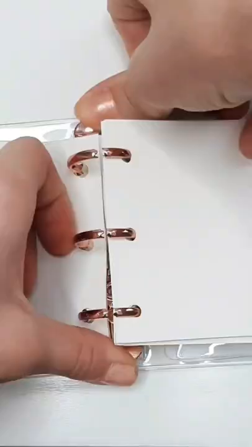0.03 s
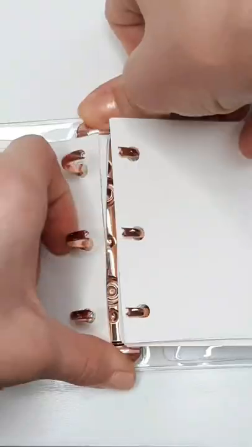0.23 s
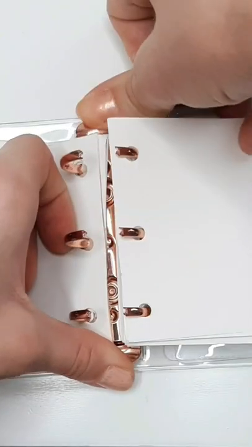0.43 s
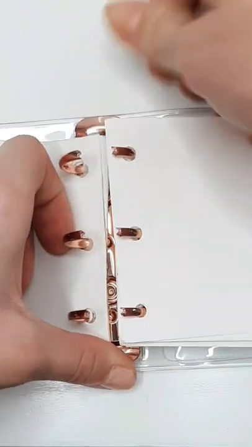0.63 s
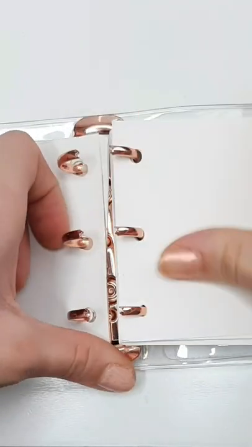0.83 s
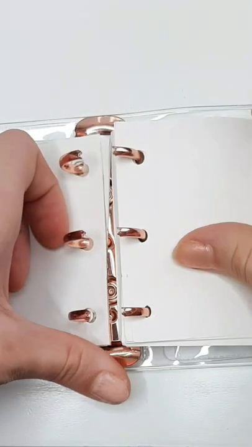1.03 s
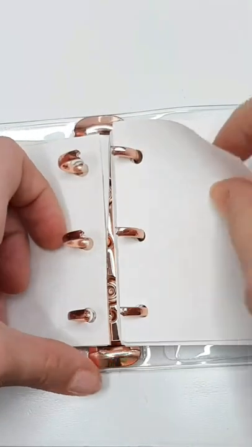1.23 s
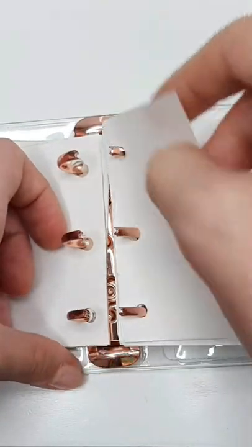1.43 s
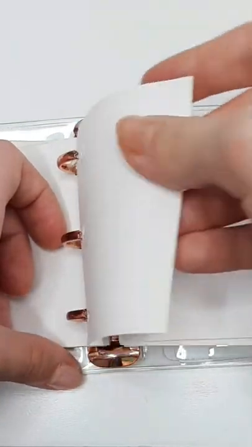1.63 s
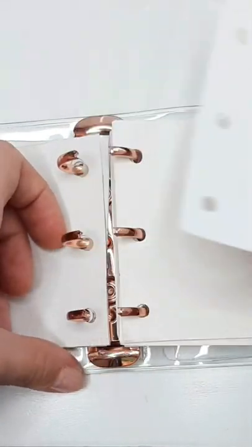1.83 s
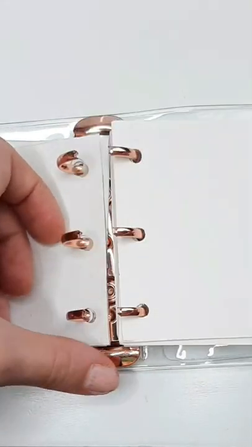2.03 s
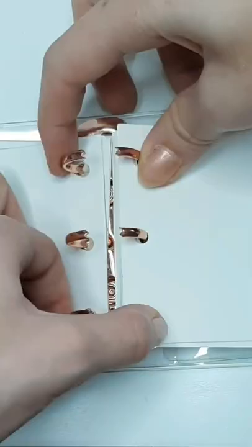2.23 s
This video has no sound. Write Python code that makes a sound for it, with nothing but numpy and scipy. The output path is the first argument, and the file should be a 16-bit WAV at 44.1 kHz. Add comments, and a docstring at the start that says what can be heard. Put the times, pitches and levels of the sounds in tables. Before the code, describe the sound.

A sharp snap of binder rings opening, followed by light knocks and rustling paper.

```python
"""Opening a binder and turning a page

A spring creaks and snaps a small binder's metal rings open, shaking the cover and desk and
overloading the microphone. Fingers shift and knock on the cover. Then a page slides, catches on
the rings, flaps free and brushes over the other pages; its rustle is countless tiny slips of
paper fibres. A small hard room echoes the knocks and the paper, over a faint steady noise."""
import sys
import numpy as np
from scipy import signal
from scipy.fft import rfft, irfft, next_fast_len
from scipy.io import wavfile

SR = 44100
rng = np.random.default_rng(int(sys.argv[2]) if len(sys.argv) > 2 else 0)


def to_wav(sig):
    """Store sig (one row per channel, or 1-D mono) as 16-bit WAV at the path in sys.argv[1].

    Samples outside -1..1 are clipped; the rate is SR.
    """
    pcm = np.clip(np.atleast_2d(sig), -1, 1) * 32767
    pcm = np.round(pcm).astype(np.int16)
    wavfile.write(sys.argv[1], SR, pcm.T)  # frames by channels


N = 101429

# Levels in dB are relative. A fade time (t60) is how long a sound takes to drop by 60 dB.
# The spring creaks. Each row: start in seconds, hold in seconds, level in dB.
CREAKS = [(.002, 0.025, -39), (0.216, 0.0024, -15.5)]
# The tones of the ring tips. Each row: pitch in Hz, width in Hz.
TIP_TONES = [(3350, 470), (3850, 300), (5150, 160)]
# The hiss of shifting fingers. Each row: time in seconds, level in dB.
FINGER_LEVELS = [(.04, -65), (.435, -73), (0.453, -41.5), (.52, -57), (.62, -56.5), (0.801, -62),
                 (.93, -47.5), (1.02, -64), (1.09, -88)]
# Knocks on the cover. Each row: start in seconds, hold in seconds, thud in dB, tick in dB.
KNOCKS = [(0.127, .015, -55, -80), (.18, 0.05, -54.5, -87), (0.596, 0.021, -36.5, -43.5),
          (0.628, 0.047, -54, -55), (0.7, 0.0029, -45.5, -44.5), (0.826, 0.0064, -41, -45),
          (0.848, 0.016, -40, -39.5), (0.874, 0.0029, -37, -33), (1.019, .005, -57, -72),
          (1.106, 0.0016, -55, -51), (1.165, 0.0068, -45.5, -52), (1.844, 0.0071, -47.5, -30.5)]
# The metal spine answers each knock. Each row: pitch in Hz, width in Hz, gain.
SPINE_TONES = [(900, 70, .7), (2056, 60, 1.8)]
# Spine, cover and desk ring together at the snap.
# Each row: pitch in Hz, level in dB, fade time in seconds, left side's lead in radians.
BINDER_TONES = [(72.5, -15.5, 0.46, 0.16), (123.7, 4, 0.27, 0), (168.5, -4.5, 0.39, 1.8),
                (245.8, -6, .3, 0), (393.6, -4.5, 0.25, 0.8), (522.5, -1.5, .26, 1.2),
                (634.3, 8.5, 0.22, 1.1), (666, 7, 0.25, .9), (687.4, -1, 0.21, 1.2), (731.3, -9, 0.19, 3.4),
                (902.6, 6, 0.25, 0.74), (943.5, -0.5, 0.33, 1.5), (1223, -18.5, 0.48, 0.43),
                (1560, -17, .28, 1.8)]
# The tones of the bent sheet. Each row: pitch in Hz, width in Hz, gain.
SHEET_TONES = [(1094, 46, 0.68), (1472, 20, 1), (1565, 92, 0.21), (2700, 53.2, 0.56)]
# Paper rubs on paper, one list per stroke. Each row: time in seconds, rasp in dB, hiss in dB.
STROKES = [
    [(0, -40.5, -51), (.022, -36.5, -31), (.031, -66, -74)],
    [(1.1, -67, -56), (1.132, -62, -37), (1.16, -45.5, -24.5), (1.195, -48, -47.5), (1.22, -39.5, -39),
     (1.28, -53, -52), (1.322, -38, -34), (1.348, -47.5, -47.5), (1.367, -37.5, -40.5), (1.385, -46.5, -45),
     (1.437, -43, -43), (1.448, -31, -25.5), (1.483, -24, -27), (1.495, -28, -35), (1.55, -33.5, -57),
     (1.595, -24, -56), (1.63, -41, -40), (1.71, -36.5, -42.5), (1.8, -48, -44), (1.86, -61, -32.5),
     (1.885, -56, -58)],
    [(1.955, -60, -54), (1.971, -59, -46), (1.979, -26, -19), (2.02, -27, -32.5), (2.07, -37.5, -37),
     (2.103, -27, -26), (2.137, -41, -39.5), (2.18, -30, -28), (2.2, -47, -55), (2.27, -73.5, -80.5)],
]
# The page catches. Each row: start in seconds, hold in seconds, then bass, middle and treble in dB.
FLICKS = [(1.252, 0.0036, -74, -40, -34.5), (1.392, 0.0057, -68, -41.5, -29),
          (1.427, .002, -58, -37, -30.5), (1.452, 0.0053, -36, -32.5, -34), (1.5055, .004, -25, -9, -13),
          (1.512, 0.0071, -28, -7.5, -10.5), (1.522, 0.011, -23.5, -21, -21),
          (1.5638, 0.0066, -19, -5.5, -5), (1.7194, 0.0015, -44, -15, -9), (1.759, 0.0016, -32.5, -46, -36),
          (1.81, 0.0018, -67, -56, -53), (1.854, 0.0087, -64, -35.5, -42), (1.974, 0.0053, -33.5, -19, -35),
          (1.998, 0.01, -30.5, -17.5, -15), (2.021, 0.03, -29.5, -23, -50),
          (2.0433, 0.0057, -37, -28.5, -28)]
# Fade times in seconds for a flick's bass, middle and treble. The treble dies first.
FLICK_FADES = [0.054, 0.044, 0.024]
# The page's edge ticks. Each row: start in seconds, level in dB.
EDGE_TICKS = [(1.253, -43), (1.394, -32), (1.566, -30), (1.7208, -18), (1.791, -26), (1.8145, -27),
              (1.96, -37.5), (1.9737, -15), (2.005, -10), (2.045, -15.5), (2.181, -20.5), (2.199, -26.5)]
# Puffs of air. Each row: start in seconds, hold in seconds, level in dB.
PUFFS = [(1.487, 0.074, -41), (1.573, 0.011, -49), (1.727, 0.015, -34.5), (1.75, 0.029, -41),
         (1.839, 0.027, -46.5), (1.921, .03, -61)]
# The taut sheet rings. Each row: pitch in Hz, level in dB.
FLAP_TONES = [(1670, -11), (2770, -25.5), (3060, -38)]
# Paper and knocks lean left. Each row: frequency in Hz, how much louder the left is in dB.
LEFT_BALANCE = [(60, 6), (400, 7), (1500, 4.5), (4500, 4.5), (8000, 3), (13000, 0.5)]

# A colour says how strong a noise is from bass to treble. Each row: frequency in Hz, level in dB.
FINGER_COLOUR = [(3000, -27), (6000, -9.5), (9000, -15), (12000, -0.5), (14000, 0.5), (16000, -3)]
THUD_COLOUR = [(25, -17.5), (80, -1), (160, -6), (260, -3.5), (420, -10), (800, -1.5), (1300, -12),
               (2100, -12), (3200, -22.5), (15000, -41)]  # the knocked cover
TICK_COLOUR = [(25, -31), (1000, -21.5), (3000, -0.5), (5500, 6), (7000, 6), (9000, -8), (13000, 4),
               (16000, -9.5)]  # hard contact, in the knocks and the snap
RATTLE_COLOUR = [(25, -26.5), (60, -7.5), (110, -7.5), (220, 7.5), (420, -4.5), (800, 3.5), (1100, -7.5),
                 (1900, -8), (2600, -23.5), (4400, -29), (5300, -19.5), (6300, -29.5), (7600, -27),
                 (9500, -29.5), (15000, -32.5)]  # the ring mechanism and its echo
RASP_COLOUR = [(25, -24), (300, -19), (900, -17.5), (1600, -8), (2300, -2.5), (3200, -3.5), (4300, -1),
               (6500, -12), (15000, -36)]  # the rough part of rubbing paper
HISS_COLOUR = [(500, -37.5), (2800, -25), (4500, -4), (7000, 7), (8800, -11), (11500, 2.5), (14000, -1),
               (16000, 1)]  # its bright part
FLICK_COLOURS = [
    [(25, -8.5), (120, -14.5), (280, -0.5), (500, 1.5), (780, 2), (1200, -6.5), (3000, -46)],
    [(300, -41.5), (700, -12.5), (1050, -4.5), (1600, -1.5), (2800, -4.5), (4000, -8), (8000, -40.5)],
    [(1200, -35), (3000, 3.5), (4200, 2.5), (7300, 2.5), (8800, -13), (11500, -7.5), (16000, -13)],
]  # one list each for bass, middle and treble
EDGE_COLOUR = [(300, -15), (1500, -12), (4500, 7.5), (7000, -4.5), (9000, -8), (12500, 3), (16000, -1)]
PUFF_COLOUR = [(25, -14), (60, 0.5), (130, 0.5), (250, -4), (500, -9.5), (1500, -54.5)]
FLAP_COLOUR = [(25, -31), (100, -13.5), (400, -21), (900, -13.5), (1400, 0), (1700, 1.5), (2050, -1.5),
               (2900, 3), (3800, -5), (6000, -26), (15000, -49)]
ROOM_COLOUR = [(25, 6), (150, 3), (500, 3), (1800, 1.5), (4000, -4.5), (6500, 0), (9000, -2), (16000, 2.5)]
BACKGROUND_COLOUR = [(25, -14), (70, 1), (130, 0.5), (300, -7), (800, -10), (2000, -16.5), (4000, -21.5),
                     (6500, -20.5), (9000, -30.5), (13000, -16.5), (16000, -16)]

SNAP_S, SNAP_RISE_S = .2195, .0024
FLAP_S, FLAP_RISE_S, FLAP_HOLD_S = 1.7455, .0027, .011
TIME = np.arange(N) / SR  # seconds at each sample


def from_db(db):
    """Turn decibels into a gain to multiply by."""
    return 10 ** (np.asarray(db) / 20)


def rms_one(x):
    """Scale a sound to an average (RMS) level of one."""
    return x / np.sqrt(np.mean(x ** 2) + 1e-20)


def colour(x, points):
    """Give a noise a colour and a level of one."""
    hz, db = np.transpose(points)
    size = next_fast_len(N)
    bins = np.maximum(np.fft.rfftfreq(size, 1 / SR), 1)
    gain = from_db(np.interp(np.log(bins), np.log(hz), db))
    return rms_one(irfft(rfft(x, size) * gain, size)[..., :N])


def spread(mid, side, likeness=.63):
    """Mix two unrelated sounds into a partly alike left and right."""
    return np.sqrt(1 + likeness) * mid + np.sqrt(1 - likeness) * side * np.array([[1], [-1]])


def white_noise():
    """Stereo noise, equally strong at all frequencies."""
    return spread(*rng.standard_normal((2, N)))


def noise(points):
    """Smooth stereo noise of a given colour."""
    return colour(white_noise(), points)


def resonance(x, hz, width_hz):
    """Let a sound ring at one pitch; a narrower width rings longer."""
    r = np.exp(-np.pi * width_hz / SR)
    feedback = [1, -2 * r * np.cos(2 * np.pi * hz / SR), r * r]
    return signal.lfilter(np.array([1, 0, -1]) * (1 - r * r) / 2, feedback, x)


def burst(start, rise, hold, t60):
    """A gain that rises, holds and fades. All times are in seconds."""
    t = TIME - start
    return np.clip(t / rise, 0, 1) * from_db(-60 * np.clip((t - rise - hold) / t60, 0, 3))


def bursts(rows, rise, t60):
    """Add up one burst for each row of start, hold and dB."""
    return sum(from_db(db) * burst(start, rise, hold, t60) for start, hold, db in rows)


def level(times, db):
    """A gain that follows a level curve and is silent outside it."""
    return from_db(np.interp(TIME, times, db, left=-150, right=-150))


def wander(step_s, channels):
    """Drift between -1 and 1, with a new random goal at each step."""
    goals = rng.uniform(-1, 1, (channels, N))
    return np.array([np.interp(TIME / step_s, np.arange(N), row) for row in goals])


def spring_creak():
    """The spring creaks under strain before it gives way."""
    creak = rms_one(resonance(white_noise(), hz=690, width_hz=32))
    return creak * bursts(CREAKS, rise=.0011, t60=.025)


def tip_click():
    """The ring tips click against each other once."""
    metal = rms_one(sum(resonance(white_noise(), hz, width) for hz, width in TIP_TONES))
    return from_db(-24) * metal * burst(start=.0255, rise=.00042, hold=.0021, t60=.0054)


def finger_hiss():
    """A faint high hiss swells as the fingers shift."""
    return level(*np.transpose(FINGER_LEVELS)) * noise(FINGER_COLOUR)


def cover_knocks(rise=.0013):
    """Fingers and rings knock on the cover: a thud, a tick and the metal spine ringing."""
    thuds = [(start, hold, db) for start, hold, db, _ in KNOCKS]
    ticks = [(start, hold, db) for start, hold, _, db in KNOCKS]
    thud = noise(THUD_COLOUR) * bursts(thuds, rise, t60=.053)
    tick = noise(TICK_COLOUR) * bursts(ticks, rise, t60=.025)
    spine = sum(gain * resonance(thud, hz, width) for hz, width, gain in SPINE_TONES)
    return thud + tick + spine


def ring_snap(chatter_db=1.5, bass_below_hz=130):
    """The spring throws the rings open: a crack of metal, ringing tones and a dying rattle."""
    snap = from_db(.5) * noise(TICK_COLOUR) * burst(SNAP_S, SNAP_RISE_S, hold=0, t60=.03)
    for k, (hz, db, t60, lead) in enumerate(BINDER_TONES):
        chatter = chatter_db * wander(step_s=.0099, channels=2)  # loose rings shake each tone
        tone = (-1) ** k * np.sin(2 * np.pi * hz * (TIME - SNAP_S) - np.array([[0], [lead]]))
        snap += from_db(db - .5 + chatter) * tone * burst(SNAP_S, SNAP_RISE_S, 0, t60)
    rattle = from_db(9.5) * delay_right(noise(RATTLE_COLOUR), lag_s=.00006)
    for band, t60 in (("low", .42), ("high", .29)):  # the bass lasts longer
        band_filter = signal.butter(2, bass_below_hz, band, fs=SR, output="sos")
        snap += signal.sosfilt(band_filter, rattle) * burst(SNAP_S, SNAP_RISE_S, 0, t60)
    return snap * from_db([[1], [-1]])  # a little louder on the left


def fibres(points, slips_per_s=3800, slip_share=.55, clump_db=4):
    """Paper fibres make countless tiny slips, in clumps, and the sheet rings with them."""
    slipping = rng.random(N) < slips_per_s / SR
    sizes = slipping * from_db(2 * np.minimum(rng.exponential(1, N), 4))
    slips = np.sqrt(slip_share) * rms_one(sizes) * rng.choice([-1, 1], (2, N))
    smooth = np.sqrt(1 - slip_share) * rng.standard_normal((2, N))
    rustle = spread(*(slips + smooth)) * from_db(clump_db * wander(step_s=.004, channels=1))
    ringing = sum(gain * resonance(rustle, hz, width) for hz, width, gain in SHEET_TONES)
    return colour(rustle + ringing, points)


def page_slide():
    """Paper rubs on paper with a grainy rasp and a hiss."""
    strokes = [np.transpose(rows) for rows in STROKES]
    rasp = sum(level(times, db) for times, db, _ in strokes) * fibres(RASP_COLOUR)
    hiss = sum(level(times, db) for times, _, db in strokes) * fibres(HISS_COLOUR)
    return rasp + hiss


def finger_squeak():
    """A fingertip sticks on the page with one tiny squeak."""
    squeak = rms_one(resonance(rng.standard_normal(N), hz=13900, width_hz=190))
    return from_db(-29) * squeak * burst(start=1.137, rise=.0013, hold=.0024, t60=.06)


def page_flicks():
    """The page crackles as its punched holes catch on the rings and jump off."""
    crackle = 0
    for band, (points, t60) in enumerate(zip(FLICK_COLOURS, FLICK_FADES)):
        flicks = [(start, hold, levels[band]) for start, hold, *levels in FLICKS]
        crackle += fibres(points) * bursts(flicks, rise=.00042, t60=t60)
    return from_db(-1.5) * crackle


def edge_ticks():
    """The edge of the page gives short, dry, bright ticks."""
    ticks = sum(from_db(db) * burst(start, rise=.0003, hold=.00034, t60=.0095)
                for start, db in EDGE_TICKS)
    return fibres(EDGE_COLOUR) * ticks


def air_puffs():
    """The moving page pushes air at the microphone."""
    return noise(PUFF_COLOUR) * bursts(PUFFS, rise=.008, t60=.091)


def page_flap():
    """The freed page flaps once."""
    return from_db(-6) * fibres(FLAP_COLOUR) * burst(FLAP_S, FLAP_RISE_S, FLAP_HOLD_S, t60=.042)


def sheet_ring():
    """The taut sheet rings briefly as it flaps."""
    tones = sum(from_db(db) * np.sin(2 * np.pi * hz * (TIME - FLAP_S)) for hz, db in FLAP_TONES)
    return tones * burst(FLAP_S, FLAP_RISE_S, FLAP_HOLD_S, t60=.026)


def add_desk_echo(x, gain=.43, delay_s=.0010675, swing_s=.0005):
    """The desk reflects the sound, with a delay that wanders as the sheet bends."""
    delays = delay_s + swing_s * wander(step_s=.06, channels=1)[0]
    echo = np.array([np.interp(TIME - delays, TIME, side) for side in x])
    return (x + gain * echo) / np.hypot(1, gain)


def delay_right(x, lag_s, top_hz=6250):
    """Below the high treble, the sound reaches the right microphone a little later."""
    hz = np.fft.rfftfreq(N, 1 / SR)
    lags = lag_s / (1 + (hz / top_hz) ** 8)
    right = irfft(rfft(x[1]) * np.exp(-2j * np.pi * hz * lags), N)
    return np.array([x[0], right])


def lean_left(x):
    """Make the left side louder than the right, most of all in the low notes."""
    hz, db = np.transpose(LEFT_BALANCE)
    size = next_fast_len(N + SR // 10)
    tilt_db = np.interp(np.log(np.fft.rfftfreq(size, 1 / SR) + 1), np.log(hz), db)
    return irfft(rfft(x, size) * from_db([tilt_db / 2, -tilt_db / 2]), size)[:, :N]


def room_echo(x):
    """Reflections off hard walls build up and die away, different for each ear."""
    tail = colour(rng.standard_normal((2, N)), ROOM_COLOUR) * burst(0, rise=.012, hold=0, t60=.23)
    tail = tail[:, :SR // 2] / np.sqrt(np.sum(tail ** 2) / 2)
    return from_db(-12) * signal.fftconvolve(x, tail, axes=1)[:, :N]


def scene():
    """Mix it all: paper and knocks lie a little to the left, and the snap fills both sides."""
    rustle = page_flicks() + page_flap() + page_slide() + finger_hiss() + finger_squeak()
    paper = add_desk_echo(rustle) + edge_ticks() + air_puffs() + sheet_ring()
    handling = lean_left(delay_right(cover_knocks() + paper, lag_s=.0001759))
    rings = spring_creak() + tip_click() + ring_snap()
    return rings + handling + room_echo(handling) + from_db(-57.5) * noise(BACKGROUND_COLOUR)


def record(dry, ceiling=.89, hardness=12, cutoff_hz=16000):
    """The overloaded microphone flattens the loudest peaks, and the highest treble is cut."""
    clipped = dry / (1 + np.abs(dry / ceiling) ** hardness) ** (1 / hardness)
    return signal.sosfilt(signal.ellip(12, .1, 80, cutoff_hz, fs=SR, output="sos"), clipped)


dry = scene()
out = record(dry)
to_wav(out)
```